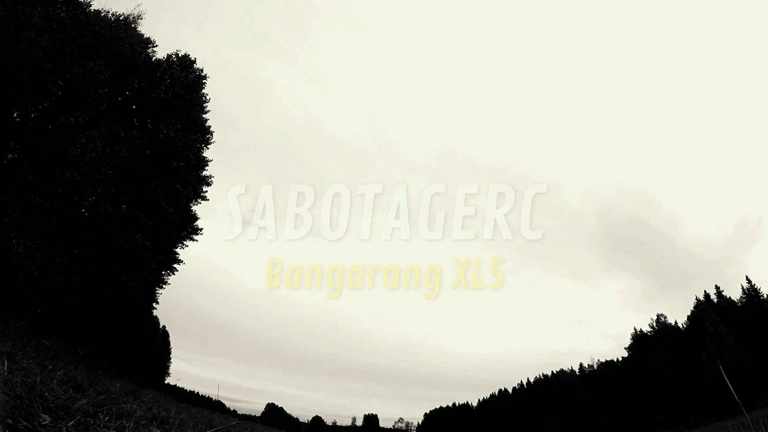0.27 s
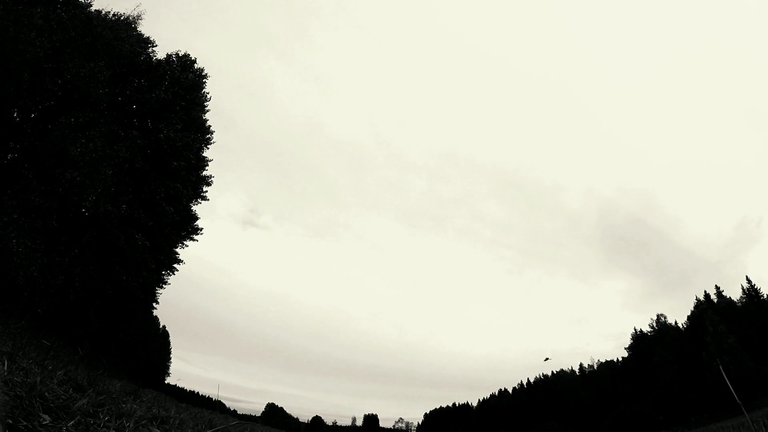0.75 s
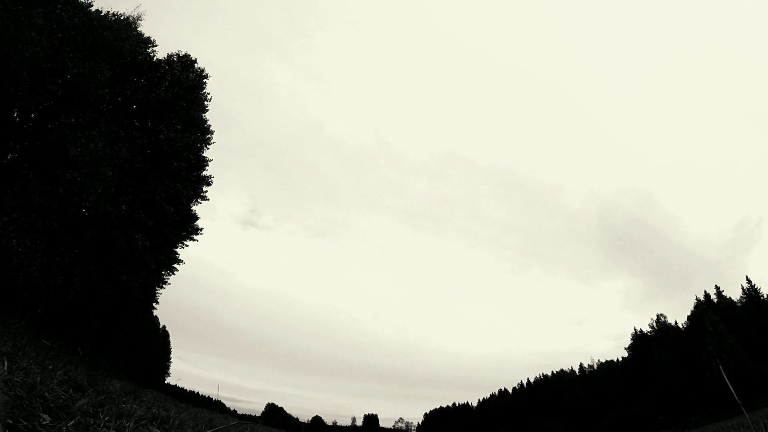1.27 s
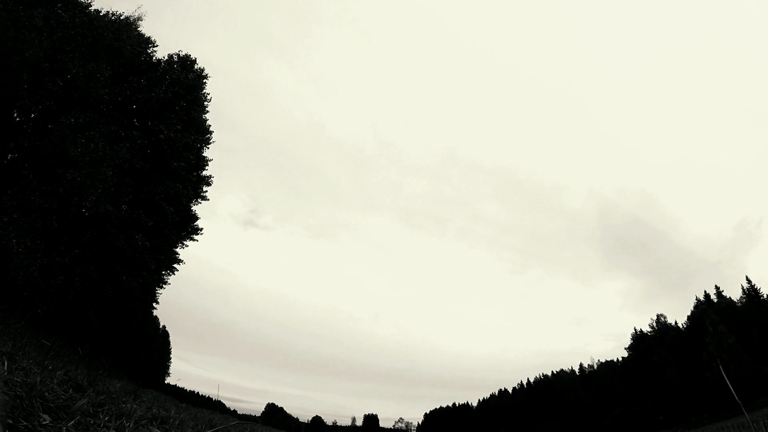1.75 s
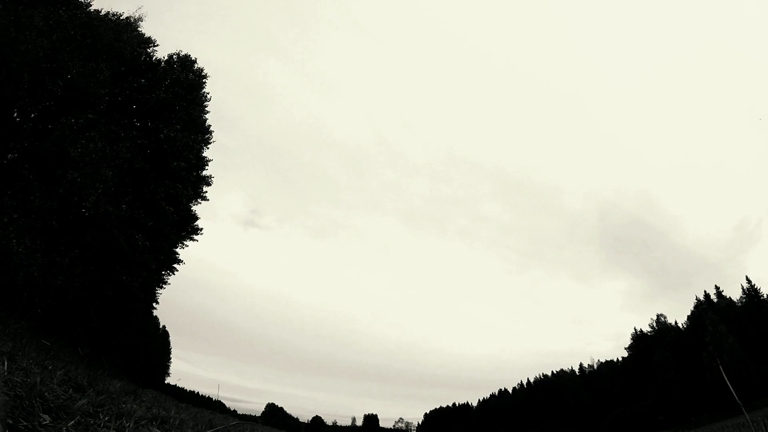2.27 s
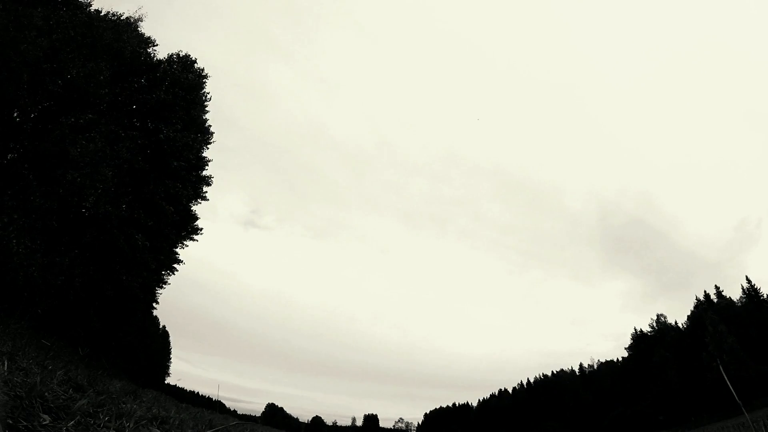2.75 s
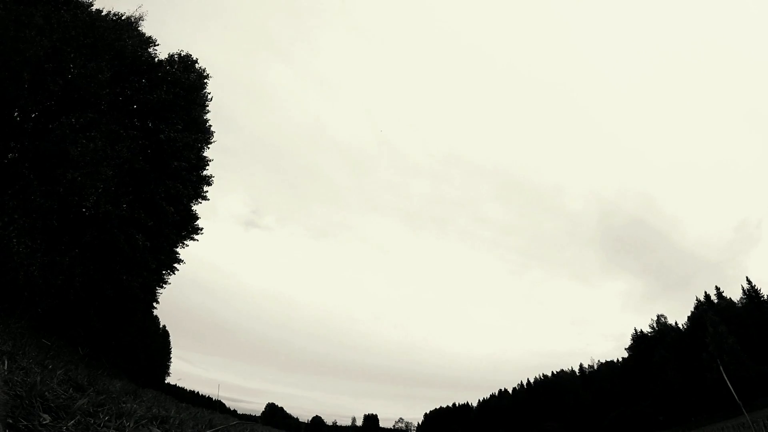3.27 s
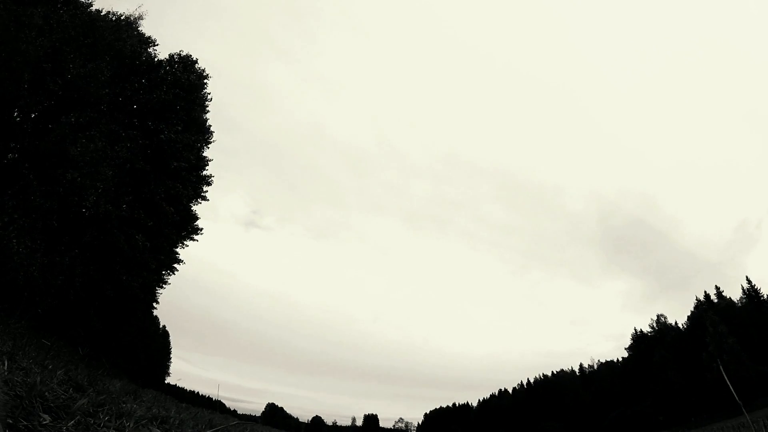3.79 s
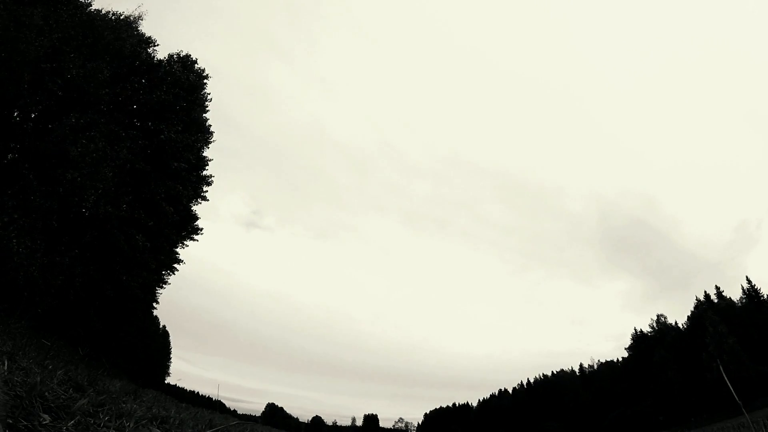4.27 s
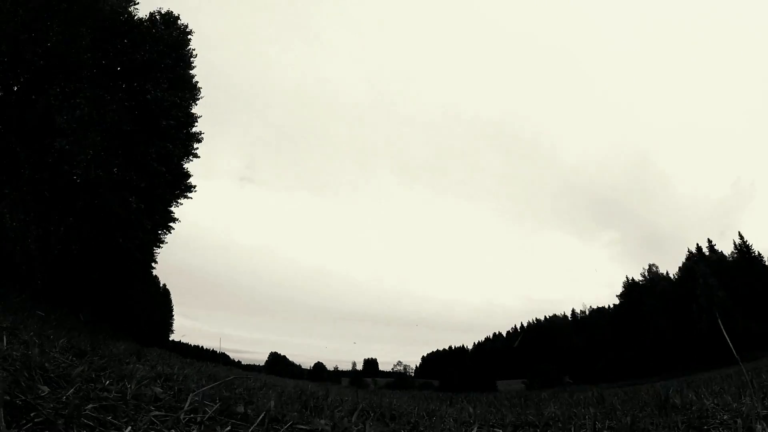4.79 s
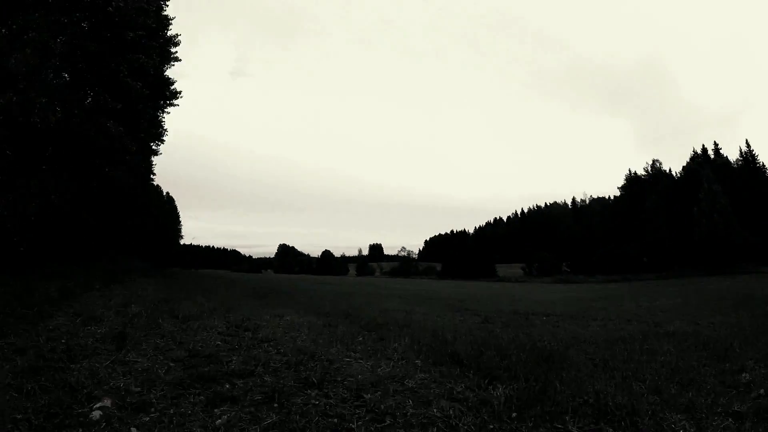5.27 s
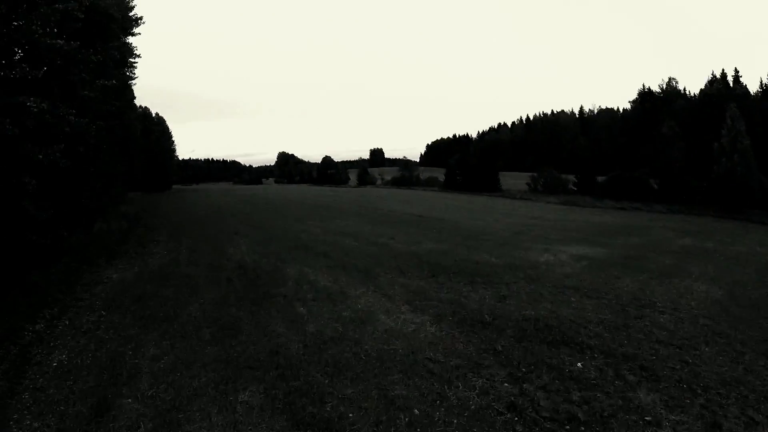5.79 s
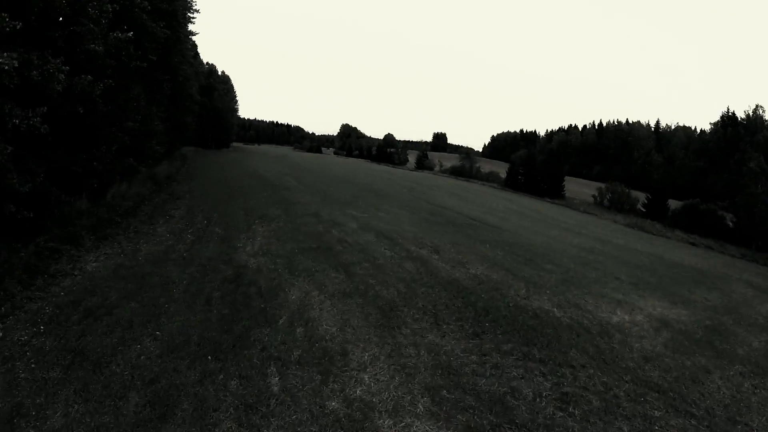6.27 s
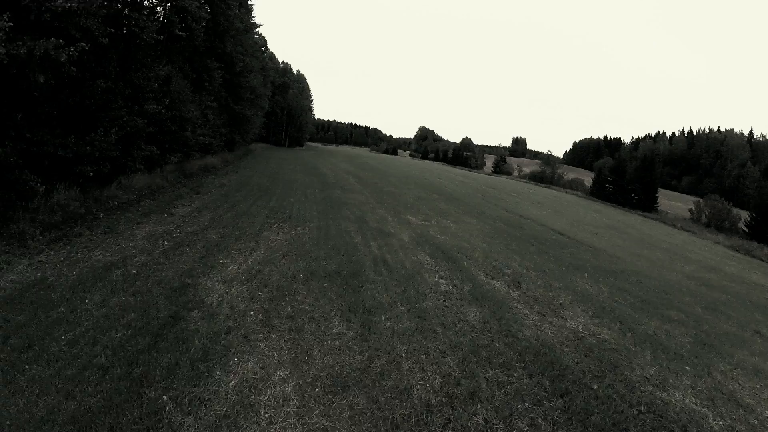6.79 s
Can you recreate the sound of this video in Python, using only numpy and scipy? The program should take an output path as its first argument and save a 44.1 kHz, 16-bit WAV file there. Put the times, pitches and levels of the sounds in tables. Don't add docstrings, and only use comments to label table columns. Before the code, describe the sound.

A small quadcopter idles in grass with a beating low hum and rattles, then spools up abruptly and whines away in flight, dipping and climbing.

```python
import sys
import numpy as np
from scipy import signal
from scipy.fft import rfft, irfft
from scipy.io import wavfile
from scipy.ndimage import uniform_filter1d

SR = 44100
rng = np.random.default_rng(int(sys.argv[2]) if len(sys.argv) > 2 else 0)


def volts_from_db(level):
    exponent = np.asarray(level, float) / 20
    return 10 ** exponent


def transcribe(u):
    v = np.clip(np.atleast_2d(u).T, -1, 1)
    q = np.round(v * 32767).astype(np.int16)
    wavfile.write(sys.argv[1], SR, q)


N = 310464

SPOOL_S = 4.69
AIRSPEED_FROM_S = 5.41
IDLE_BLADE_HZ = 137.54
# time in seconds, level in dB.
IDLE_SWELL = [
    (0.0, -3),
    (0.13, -1),
    (2.5, 3.5),
    (3.2, 1.5),
    (3.48, -2),
    (4.48, 1.5),
    (4.6, 0),
]
# frequency in Hz, density in dB per Hz.
BLADE_HISS = [(3000, -23), (3800, -10), (4300, -7.5), (5150, -3.5), (5960, -4), (6600, -1.5), (7500, -8),
              (9600, -15), (10200, -23), (12900, -41.5), (13100, -49)]


def at_hz(points, hz):
    return np.interp(np.log(hz), np.log(np.array(points)[:, 0]), np.array(points)[:, 1])


def in_time(rows):
    s, *columns = np.transpose(rows)
    return [np.interp(np.arange(N) / SR, s, c) for c in columns]


def bumps(rows):
    return sum(height * np.exp(-((np.arange(N) / SR - s) / length_s) ** 2) for s, height, length_s in rows)


def rms_one(x):
    return x / np.sqrt(np.mean(x ** 2) + 1e-20)


def gate(start_s, fade_s):
    return np.clip((np.arange(N) / SR - start_s) / fade_s, 0, 1)


def forward_flight():
    return gate(AIRSPEED_FROM_S, 0.31)


def drift(rate):
    r = np.exp(-32 * np.pi * rate / SR)
    draws = rng.standard_normal(N // 16 + 4002)
    slow = signal.lfilter([1], [1, -2 * r, r * r], draws)[4000:]
    return np.interp(np.arange(N) / 16, np.arange(len(slow)), rms_one(slow))


def resonance(x, hz, width_hz):
    r = np.exp(-np.pi * width_hz / SR)
    top = np.array([1, 0, -1]) * (1 - r * r) / 2
    return signal.lfilter(top, [1, -2 * r * np.cos(2 * np.pi * hz / SR), r * r], x)


def coloured(spectrum, patchy_db):
    hz = np.maximum(np.arange(N // 2 + 1) * SR / N, 1)
    low_hz, high_hz = spectrum[0][0], spectrum[-1][0]
    inside = (hz > low_hz) & (hz < high_hz)
    white = rfft(rng.standard_normal(N)) * volts_from_db(at_hz(spectrum, hz)) * inside
    out, together = np.zeros(N), drift(44.0)
    for centre in np.arange(np.log2(low_hz), np.log2(high_hz) + .5, .5):
        band = np.clip(1 - 2 * np.abs(np.log2(hz) - centre), 0, 1)
        out += irfft(white * band, N) * volts_from_db(patchy_db * (together + drift(5.7)))
    return rms_one(out)


def turning(hz, wobble):
    return 2 * np.pi * np.cumsum(hz * (1 + wobble * drift(15.15))) / SR


def line(phase, rough, flutter=12.0, locked=False):
    rough = np.clip(rough, 0, 1)
    start = 0 if locked else rng.uniform(0, 2 * np.pi)
    broken = drift(flutter) + 1j * drift(flutter)
    swing = np.sqrt(1 - rough) + np.sqrt(rough / 2) * broken
    return np.sqrt(2) * np.real(swing * np.exp(1j * (phase + start)))


def throttle():
    # time in
    # seconds, near blade rate in Hz, fast blade rate in Hz, near load in dB, fast load in dB.
    flight_rows = [
        (4.7, 200, 320.3, -36, -14),
        (4.75, 250, 422, -24.5, -14),
        (4.78, 326.5, 500.6, -31, -23),
        (4.825, 431.3, 476, -25.5, -33),
        (4.865, 449.5, 480, -12, -28),
        (4.886, 458.5, 484.7, -30, -28),
        (4.91, 464.7, 486.1, -14, -17),
        (4.95, 489.4, 497, -33, -23.5),
        (4.98, 516.2, 509, -35, -20),
                   (5.0, 534.5, 517.2, -28.5, -33), (5.05, 603, 576.7, -23, -36), (5.1, 637, 651, -28, -41),
                  (5.15, 670.4, 692.3, -20.5, -29), (5.2, 663.7, 690, -27, -37.5),
                  (5.3, 658, 710.5, -26.5, -27.5), (5.37, 669, 729.3, -25, -29),
                  (5.45, 654, 708, -25.5, -26), (5.52, 628.5, 668, -25.5, -21), (5.6, 580, 622, -28, -27.5),
                  (5.7, 512, 538, -28.5, -21), (5.799, 413, 452, -32.5, -25.5),
                  (5.86, 381.3, 395.3, -30, -24), (5.91, 364, 373.5, -26, -36),
                  (6.03, 326.3, 342.4, -25, -37), (6.14, 321.3, 334.4, -25, -34),
                  (6.25, 323.2, 337.3, -23.5, -36), (6.32, 332, 353.4, -21.5, -29),
                  (6.36, 348.8, 376.4, -19.5, -28), (6.45, 421, 486, -19.5, -23),
                  (6.56, 507.4, 577, -14.5, -21), (6.64, 554.8, 620.5, -16.5, -22),
                  (6.72, 616.4, 680, -13.5, -19), (6.8, 647.3, 716, -16.5, -20.5),
                  (6.9, 669.3, 740, -13, -19), (7.04, 689, 750, -15.5, -24)]
    # time in seconds, speed change in %, length in seconds.
    near_trims = [(5.36, -.9, 0.0151), (5.41, 1, 0.0298), (5.445, -1, .015), (5.94, -0.85, 0.0299),
                  (6.02, 1, .03), (6.41, 1.2, .03), (6.515, -2, .05), (6.6, -1, 0.018), (6.65, 0, .015),
                  (6.695, 0.6, .012), (6.74, 1.2, .015), (6.83, 0.5, .015), (6.96, 1.8, .012),
                  (6.995, -1.5, .02)]
    # time in seconds, speed change in %, length in seconds.
    fast_trims = [(5.4, -0.7, 0.0206), (5.45, 0.74, 0.0245), (5.51, -1.9, 0.01435), (5.535, 1.5, 0.014),
                  (5.58, -1.2, 0.031), (5.68, 1.5, 0.0247), (5.74, 1.6, 0.0308), (5.85, -0.87, 0.0495),
                  (6.42, 1.7, 0.0258), (6.51, -2.5, 0.0391), (6.59, 0, 0.027), (6.66, -0.95, 0.0357),
                  (6.71, 0.4, 0.027), (6.76, -0.4, .015), (6.815, 0, .012), (6.86, .6, 0.013),
                  (6.955, -0.9, 0.01)]
    near_hz, fast_hz, near_db, fast_db = in_time(flight_rows)
    steady = gate(4.95, .1)
    inertia = int(0.0435 * SR)
    near_hz = near_hz + steady * (uniform_filter1d(near_hz, inertia, mode="nearest") - near_hz)
    fast_hz = fast_hz + steady * (uniform_filter1d(fast_hz, inertia, mode="nearest") - fast_hz)
    since = np.arange(N) / SR - 5.28
    hunt = np.cos(2 * np.pi * 7.3 * since) * np.exp(-(since / .2) ** 2)
    near_hz = (near_hz - 2.7 * hunt) * (1 + bumps(near_trims) / 100)
    fast_hz = fast_hz * (1 + bumps(fast_trims) / 100)
    return near_hz, fast_hz, near_db, fast_db


def pull(blade_hz):
    rate = uniform_filter1d(np.gradient(np.log2(blade_hz)) * SR, size=SR // 20)
    return np.maximum(rate, 0) * forward_flight()


def air_levels():
    # time in seconds, hiss gain in dB, length in seconds.
    hiss_swells = [(4.68, 6, 0.053), (4.775, 3, 0.012), (5.075, 3, 0.029), (5.13, 4, 0.042), (5.182, -5, 0.0082),
                   (5.205, 3, 0.0072), (5.224, -6, .005), (5.238, 6, 0.0052), (5.268, 8, 0.014), (5.295, -5, .01),
                   (5.42, 1.5, 0.032), (5.8, -5, 0.15), (6.12, 0, .17), (6.42, 4, 0.067), (6.54, 5.5, 0.039),
                   (6.72, 5.5, 0.023), (6.89, 5, 0.063)]
    # time in seconds, whine gain in dB, length in seconds.
    punch = [
        (4.75, 4, .04),
    ]
    near_hz, fast_hz, near_db, fast_db = throttle()
    both_db = 10 * np.log10(volts_from_db(near_db) ** 2 + volts_from_db(fast_db) ** 2)
    load_db = uniform_filter1d(both_db, size=SR // 10) + 20
    idle_db, spooled = in_time(IDLE_SWELL)[0], gate(4.58, 0.094)
    airspeed = forward_flight()
    grass_db = 14.5 * (1 - gate(SPOOL_S, 5.74 - SPOOL_S) ** 1.28)
    cushion_db = 10.5 * (1 - gate(4.925, 0.33))
    hiss_db = -44.5 + 10 * np.log2(fast_hz / 540) + grass_db + bumps(hiss_swells)
    wash_db = -38.5 + 0.76 * load_db * airspeed + cushion_db + 2 * airspeed
    wash_db = (1 - spooled) * (-33 + idle_db) + spooled * wash_db
    hiss_db = (1 - spooled) * (-43.5 + 0.75 * idle_db) + spooled * hiss_db
    whine_db = -38.5 + 0.29 * load_db + 8 * airspeed + 1 * pull(near_hz) + bumps(punch)
    whine_db = whine_db + 2 * (1 - gate(5.35, 0.17))
    return wash_db, whine_db, hiss_db


def idle():
    # time in seconds, gain in dB, length in seconds.
    beats = [(0.0, -4.5, 0.039), (0.22, -8.5, 0.095), (0.55, -11, 0.03), (0.72, 2.5, 0.064),
             (0.95, -4.5, 0.058), (1.607, -5, 0.013), (1.645, 7.5, 0.023), (1.695, 6.5, 0.034),
             (1.78, -4, 0.026), (2.1, -9, 0.12), (2.27, -7, 0.027), (2.52, 4.5, 0.17), (2.66, -6.5, 0.035),
             (2.85, 7, 0.14), (3.11, -17, 0.025), (3.58, -11, 0.14), (3.77, -24, 0.037), (4.14, 3.5, 0.084),
             (4.44, -7, 0.066), (4.66, -10, 0.057)]
    # time in seconds, frequency in Hz.
    pole_rate = [(0.0, 638.5), (0.46, 645.6), (0.84, 637), (1.36, 647.4), (1.66, 639.4), (2.17, 649.3),
                 (2.46, 639), (2.57, 646.7), (3.04, 639.6), (3.31, 644), (3.36, 658.5), (3.64, 644),
                 (3.85, 655.4), (4.07, 652), (4.18, 664), (4.45, 634), (4.66, 638), (4.7, 642.7)]
    # time in seconds, gain in dB, length in seconds.
    pole_dips = [
        (0.0, -4, 0.17),
        (0.732, -9, 0.069),
        (3.39, -5, 0.039),
        (3.81, -14, 0.029),
        (4.657, 4, 0.068),
    ]
    # time in seconds, gain in dB, length in seconds.
    whine_flares = [
        (0.7, -24, 0.41),
        (2.953, -8, 0.094),
        (3.364, 11, 0.027),
        (3.443, 15, 0.02),
        (3.66, -12, .13),
        (4.06, -16, 0.054),
        (4.183, 14, 0.06),
        (4.404, -8, 0.086),
        (4.53, 15, 0.011),
    ]
    # frequency in Hz, width in Hz, level in dB.
    frame_rings = [(117.5, 18, -33), (201, 48.6, -28.5), (241.3, 28, -34), (400, 62, -44.5),
                   (507.7, 19, -37.5), (809, 124, -35), (1129, 59, -43), (1266.4, 48, -43.5),
                   (1385, 4.6, -51), (1686, 73, -48), (1954, 49, -48), (2238, 28, -52.5)]
    blades = turning(IDLE_BLADE_HZ, wobble=0.00045)
    out = volts_from_db(-18.5 + bumps(beats)) * line(blades, rough=0.054, flutter=11.2)
    idle_db = in_time(IDLE_SWELL)[0]
    poles = line(turning(in_time(pole_rate)[0], wobble=0.0016), rough=0.024, flutter=16.0)
    out += volts_from_db(-31.5 + bumps(pole_dips) + idle_db) * poles
    thin_whine = line(turning(1978, wobble=0.0016), rough=0.024, flutter=16.0)
    out += volts_from_db(-47 + bumps(whine_flares) + idle_db) * thin_whine
    for hz, width_hz, db in frame_rings:
        ring = resonance(resonance(rng.standard_normal(N), hz, width_hz), hz, width_hz)
        out += volts_from_db(db + drift(6.0)) * rms_one(ring)
    return out * (1 - gate(SPOOL_S, .1))


def rattling():
    # time in seconds, peak level in dB.
    rattles = [(0.137, -16), (0.198, -25), (0.287, -29), (0.39, -3.5), (0.49, -10), (0.897, -17),
               (1.094, -21), (1.165, -22), (1.246, -15), (1.296, -11), (1.482, -12), (1.57, -14),
               (1.634, -9), (1.796, -10), (1.905, -7.5), (1.969, -19), (2.036, -14), (2.072, -16),
               (2.373, -18), (2.713, -10), (2.79, -15), (2.892, -29), (2.967, -9), (3.076, -9),
               (3.108, -12), (3.249, -9), (3.31, -30), (3.53, -7), (3.621, -15), (3.691, -13), (3.728, -10),
               (3.834, -16), (4.008, -18), (4.055, -18), (4.177, -19), (4.49, -15), (4.593, -27)]
    s, db = np.transpose(rattles)
    kicks = np.full(N, 1e-18)
    kicks[(s * SR).astype(int)] = volts_from_db(db + 11)
    r = np.exp(-1 / (0.0088 * SR))
    return 1 + uniform_filter1d(signal.lfilter([1], [1, -r], kicks), size=90)


def wash(wash_db, hiss_db):
    # frequency in Hz, density in dB per Hz.
    idle_hiss = [(3000, -17.5), (3700, -8), (4400, -15), (4900, -2), (6050, -10), (6600, -3.5), (7700, -15),
                 (9600, -16.5), (10000, -27.5), (12900, -27.5), (13100, -59)]
    # frequency in Hz, width in Hz, level in dB.
    case_rings = [(4890, 400, -3.5), (5690, 190, 3.5), (6490, 280, -5.5), (3330, 280, 5.5)]
    # frequency in Hz, density in dB per Hz.
    ground_colour = [(88, -38.5), (150, -15.5), (245, -11), (325, -20), (418, -10), (586, -14.5),
                     (646, -10.5), (971, -23), (1130, -20.5), (1830, -31.5), (1960, -26.5), (2130, -32.5),
                     (4300, -46), (5590, -73), (9460, -120)]
    # frequency in Hz, density in dB per Hz.
    air_colour = [(120, 1.5), (300, -0.5), (500, 0), (900, -6.5), (1500, -5.5), (2300, -10), (2900, -13.5),
                  (3600, -11), (4100, -31), (5000, -18)]
    # time in seconds, gain in dB, length in seconds.
    wash_bursts = [
        (4.7, 9.5, .03),
        (4.77, 11.5, 0.04),
        (4.85, 3, 0.037),
        (4.96, 2.5, .07),
        (5.45, -1.5, 0.27),
        (6.2, 3, .15),
        (6.5, 2, 0.09),
    ]
    spooled, airborne = gate(SPOOL_S - .04, .08), gate(4.78, .25)
    near_hz, fast_hz = throttle()[:2]
    blade_hz = np.where(np.arange(N) < SPOOL_S * SR, IDLE_BLADE_HZ, near_hz)
    throb = np.exp(.18 * np.cos(turning(blade_hz, wobble=.004)) ** 3)
    beat = 1 + 0.23 * airborne * np.cos(turning(fast_hz - near_hz, wobble=0.023))
    hiss = coloured(idle_hiss, patchy_db=0.5)
    rung = sum(volts_from_db(db) * resonance(hiss, hz, width_hz) for hz, width_hz, db in case_rings)
    hiss = rms_one(hiss + rung)
    rush = coloured(BLADE_HISS, patchy_db=0.4)
    rung = volts_from_db(-4.5) * resonance(rush, 6550, 300) + resonance(rush, 5210, 350)
    rush = rms_one(rush + rung * (1 - 0.63 * gate(5.46, .3)))
    hiss = (1 - spooled) * hiss + spooled * beat * rush
    ground = volts_from_db(5.5) * coloured(ground_colour, patchy_db=0.68) * (1 - gate(4.68, 0.18)) * rattling()
    air = coloured(air_colour, patchy_db=2.4) * (0.46 * spooled + 0.5 * airborne)
    air = air * volts_from_db(bumps(wash_bursts))
    return (volts_from_db(wash_db) * (ground + air) + volts_from_db(hiss_db) * hiss) * throb


def wind():
    # time in seconds, gain in dB, length in seconds.
    gusts = [(1.51, 5, 0.14), (2.0, 8, 0.074), (2.13, -15, 0.036), (2.52, 11, .05), (3.08, 10, 0.037),
             (3.33, 18, 0.096), (3.53, 13, 0.031), (3.72, 14, 0.056), (3.87, 16, 0.072), (4.1, 9.5, 0.17),
             (4.63, 14.5, 0.13), (4.88, 13, 0.087), (5.04, 9, 0.098), (5.22, -9, 0.031), (6.14, 7, 0.13),
             (6.49, 3, .05), (6.69, 8, 0.091), (6.95, 6.5, 0.22)]
    band = signal.butter(2, [16, 85], "band", fs=SR, output="sos")
    low = signal.sosfilt(band, rng.standard_normal(N))
    return volts_from_db(-38 + bumps(gusts)) * rms_one(low * volts_from_db(1.1 * drift(30.0)))


def knocks():
    # time in seconds, peak level in dB, ring frequency in Hz, share of low push (negative inward).
    knock_rows = [(0.4, -8, 133, 0.043), (1.482, -11, 134, 0.4), (1.969, -9.5, 241.6, 0.36),
                  (2.039, -11, 239.4, 0.35), (2.072, -6, 238, 0.2), (2.499, -6, 136.1, 0.15),
                  (3.314, -0.5, 215, 0.18), (3.344, 0, 194.4, 0.24), (3.356, -4.5, 131, 0.19),
                  (3.531, -13.5, 247, 0.42), (3.73, -10, 254, 0.4), (3.797, -8.5, 136, .6),
                  (3.841, -10, 133, -0.47), (4.489, -11, 136, 0.4), (4.787, -4, 189, 0.49),
                  (4.868, -14, 256, 0.18), (4.867, -5, 118, 0.68), (4.94, -25, 254, 0.24),
                  (5.044, -17.5, 276, 0.2)]
    out, t = np.zeros(N + SR), np.arange(SR // 8) / SR
    lowpass = signal.butter(3, 1200, fs=SR, output="sos")
    for s, db, hz, share in knock_rows:
        ring = np.sin(2 * np.pi * hz * t) * np.exp(-t / 0.013) * (1 - np.exp(-t / 0.0038))
        rasp = 0.41 * signal.sosfilt(lowpass, rng.standard_normal(len(t))) * np.exp(-t / 0.0049)
        push = share * np.exp(-((t - .004) / 0.0013) ** 2)
        first = round(s * SR)
        out[first:first + len(t)] += volts_from_db(db) * (ring + push + rasp)
    return out[:N]


def order(shaft, k):
    return round(k) * shaft - 2.7 * (round(k) / 3 - 1)


def rotor(blade_hz, blade_db, over_db, shaft_db, whine_db, hiss_db, pole_db):
    # multiple of shaft rate, level in dB, roughness 0-1.
    overtones = [(6, 0, .08), (9, -11, .1)]
    # multiple of shaft rate, level in dB, roughness 0-1.
    whine_lines = [(9, 2, 0.1), (12, 2, 0.5), (13, -1.5, 0.8), (15, 1.5, 1), (16.1, -7.5, 0.97),
                   (18, -0.5, 0.2), (21, -5, 1), (24, -3.5, 0.9), (27, -3, 0.7), (30, -6, 0.4), (33, 1, .6),
                   (36, -3.5, 0.9), (39, -2.5, 0.6), (42, -0.5, 0.6), (45, -18, .8), (50, 0.5, .5),
                   (53, -2.5, .6)]
    # multiple of shaft rate, dB against the shaft wobble, dB per octave of speed.
    uneven = [(1, -2, 0), (2, -22, 30)]
    # frequency in Hz, gain in dB.
    case_colour = [(1000, -21), (1500, -9.5), (2100, -7.5), (2750, 0), (3400, -4), (4100, -17),
                   (5500, -26.5), (7000, -27), (9000, -28)]
    strain = np.clip(blade_hz / 616, 0, 1)
    loop = np.cos(turning(21.0, wobble=.25) + rng.uniform(0, 2 * np.pi))
    shaft_hz = blade_hz / 3 * (1 + .0035 * strain ** 2 * loop)
    unsteady = .008 * (1 - gate(5.3, 0.2584))
    shaft = turning(shaft_hz, wobble=0.001504 * strain + unsteady)
    recirculating = 0.39 * (1 - gate(5.35, 0.13))
    upper = np.zeros(N)
    for k, db, rough in overtones:
        upper += volts_from_db(over_db + db) * line(order(shaft, k), rough + recirculating, flutter=20.0, locked=True)
    for k, db, rough in whine_lines + [(14, pole_db, 0.44)]:
        hz = round(k) * shaft_hz
        thin = k <= 14.5 or k >= 32
        gain = volts_from_db(whine_db + at_hz(case_colour, hz)) + volts_from_db(hiss_db + at_hz(BLADE_HISS, hz))
        clear_db = 12 * (1 - strain) if k > 35 else 0
        broken = rough * strain if thin else rough
        tone = line(order(shaft, k), broken, flutter=(2.0 if thin else 4.5) * k, locked=True)
        upper += volts_from_db(db + clear_db) * gain * tone
    lower = volts_from_db(blade_db) * line(3 * shaft, rough=.05, locked=True)
    for k, db, tilt_db in uneven:
        speed_db = tilt_db * np.log2(blade_hz / 670)
        lower += volts_from_db(shaft_db + db + speed_db) * line(round(k) * shaft, rough=0.051 * k ** 3)
    return lower * gate(SPOOL_S, .05) + upper * (.45 * gate(4.7, .05) + .55 * gate(4.88, .12))


def wobble_db(blade_hz, top_db, loss_db_per_s, swells):
    shaft_hz = blade_hz / 3
    arm = 1 / (1 + ((shaft_hz - 199.2) / 60 * 2) ** 2)
    mount = volts_from_db(-21) / (1 + ((shaft_hz - 112) / 5.7 * 2) ** 2)
    settled_db = loss_db_per_s * (np.arange(N) / SR - SPOOL_S)
    return top_db + 20 * np.log10(arm + mount) + bumps(swells) - settled_db


def middle_rotor():
    # time in seconds, blade rate in Hz, blade tone in dB.
    middle_rows = [
        (5.0, 500, -50),
        (5.06, 579.3, -40),
        (5.1, 616, -27),
        (5.15, 640.5, -32.5),
        (5.24, 642, -36),
        (5.27, 691, -33),
        (5.36, 694, -31),
        (5.48, 673, -35.5),
        (5.54, 650.3, -35),
        (5.62, 588, -53),
    ]
    # multiple of blade rate, level in dB.
    middle_orders = [(1, -1.5), (2, -17), (3, -15), (4, -10), (5, -15), (6, -22), (7, -17), (8, -20),
                     (10, -16)]
    hz, db = in_time(middle_rows)
    blades = turning(hz, wobble=0.00418)
    stack = np.zeros(N)
    for k, rel_db in middle_orders:
        stack += volts_from_db(rel_db) * line(round(k) * blades, rough=min(0.1 * k, .7), flutter=36.0)
    return volts_from_db(db) * stack * gate(5.0, .03) * (1 - gate(5.62, .05))


def flight(whine_db, hiss_db):
    # time in seconds, blade rate in Hz, blade tone in dB.
    slow_rows = [(5.95, 333.6, -30), (6.05, 309.9, -37), (6.2, 306, -37), (6.3, 310.2, -38),
                 (6.4, 362.1, -48), (6.5, 432, -48), (6.6, 509.5, -33), (6.65, 545.6, -31),
                 (6.72, 578.6, -28), (6.8, 605, -24), (6.88, 628, -27), (6.96, 652.6, -23),
                 (7.04, 665, -29)]
    # time in seconds, wobble gain in dB, length in
    # seconds.
    near_swells = [
        (4.85, -6, 0.09),
        (5.06, -12, 0.026),
        (5.328, 0, 0.11),
        (5.683, -12, 0.089),
        (6.239, -15, 0.071),
        (6.383, 12.5, 0.043),
        (6.47, -5, .04),
        (6.6, -4, .06),
        (6.76, 5, .07),
    ]
    # time in seconds, wobble gain in dB, length in seconds.
    fast_swells = [
        (4.85, -15, 0.12),
        (5.04, 9.5, 0.045),
        (5.379, 6.5, 0.14),
        (5.68, 8.5, 0.053),
        (6.6, -3.5, 0.085),
    ]
    near_hz, fast_hz, near_db, fast_db = throttle()
    pull_db = 1 * pull(near_hz)
    airspeed = forward_flight()
    sharp_db = 3.5 * (airspeed - 1)
    slow_hz, slow_db = in_time(slow_rows)
    slow = rotor(slow_hz, slow_db, slow_db - 14.5, slow_db - 5.0, whine_db - 13.0, hiss_db - 19,
                 pole_db=7.0 + pull_db)
    locked_db = hiss_db - 12.5 - 8.5 * airspeed
    near_wobble_db = wobble_db(near_hz, -17, 3, near_swells)
    near = rotor(near_hz, near_db, near_db - 9.5 + sharp_db, near_wobble_db, whine_db - 12.5, locked_db,
                 pole_db=-5.5 + pull_db)
    fast_wobble_db = wobble_db(fast_hz, -16, 7, fast_swells)
    fast = rotor(fast_hz, fast_db, fast_db - 11.5 + sharp_db, fast_wobble_db, whine_db - 10.0, locked_db,
                 pole_db=4.0 + pull_db)
    return near + fast + slow * gate(5.9, 0.07) + middle_rotor()


def scene():
    wash_db, whine_db, hiss_db = air_levels()
    on_frame = idle() + knocks()
    in_air = wash(wash_db, hiss_db) + wind()
    return (on_frame + in_air + flight(whine_db, hiss_db))[None]


def holed_treble(x):
    # frequency in Hz, share on the ground, climbing, in forward flight.
    kept_share = [(8000, 1, 1, 1), (8800, .98, .97, .85), (9300, .96, .95, .55), (9750, .95, .9, .4),
                  (9850, .2, .5, .3), (10450, .2, .35, .3), (10650, .97, .35, .3), (11150, .97, .35, .25),
                  (11350, .15, .3, .2), (11900, .1, .25, .15), (12100, .02, .12, .01),
                  (13000, .01, .1, .005)]
    hz, s, bins = signal.stft(x, SR, nperseg=2048)
    edge_hz, *stages = np.transpose(kept_share)
    by_stage = np.transpose([np.interp(hz, edge_hz, kept) for kept in stages])
    share = by_stage[:, np.searchsorted([SPOOL_S, AIRSPEED_FROM_S], s)]
    draw = rng.random((len(hz) // 4 + 1, len(s) // 2 + 1))
    draw = draw.repeat(4, axis=0).repeat(2, axis=1)
    bins = bins * (draw[:len(hz), :len(s)] < share)
    return signal.istft(bins, SR, nperseg=2048)[1][:N]


def roll_off(x):
    return signal.sosfilt(signal.butter(12, 12900, fs=SR, output="sos"), x)


def record(dry):
    # frequency in Hz, density in dB per Hz.
    mic_noise = [(6000, -20.5), (8000, 4), (12900, -6), (13100, -39)]
    heard = dry[0] + volts_from_db(-64.5) * coloured(mic_noise, patchy_db=-2.5)
    rounded = 1.194 * np.tanh(heard / 1.23)
    mix = holed_treble(rounded)[None]
    return roll_off(mix)


dry = scene()
out = record(dry)
transcribe(out)
```